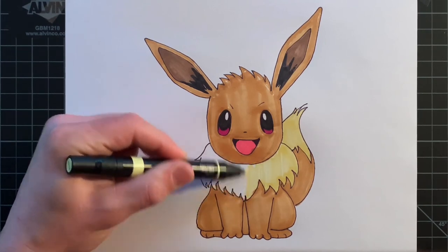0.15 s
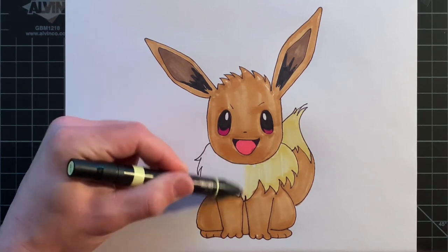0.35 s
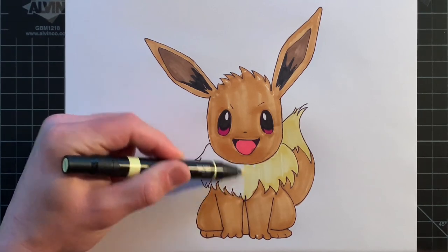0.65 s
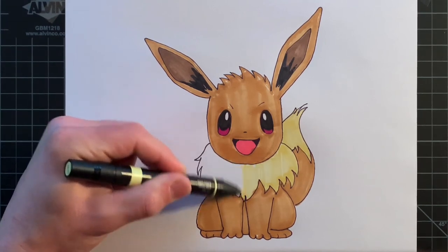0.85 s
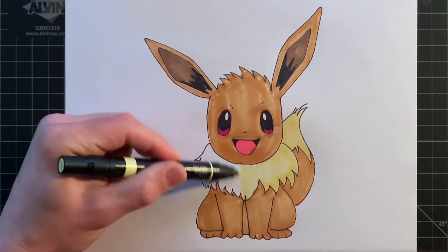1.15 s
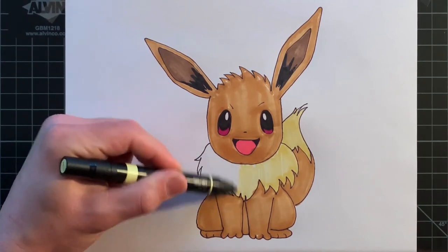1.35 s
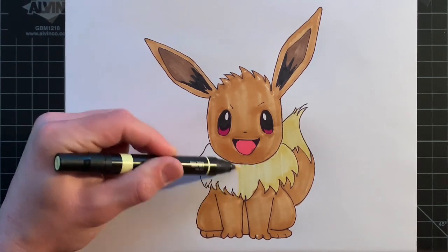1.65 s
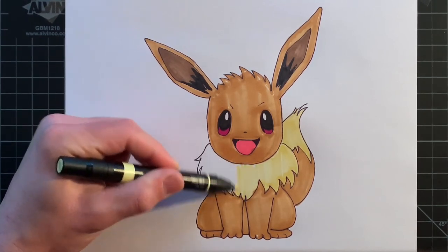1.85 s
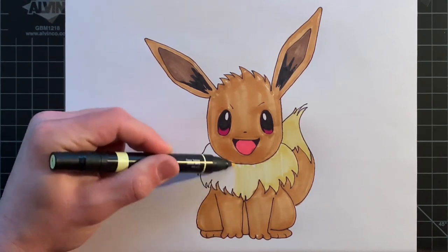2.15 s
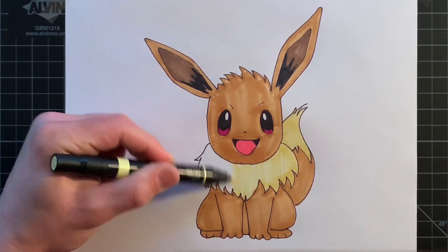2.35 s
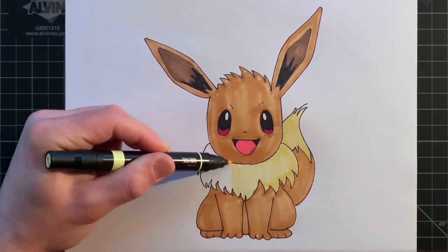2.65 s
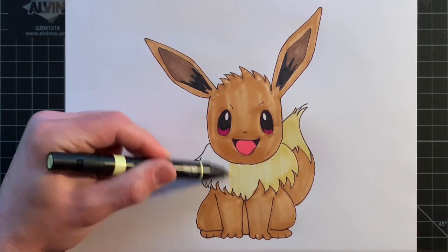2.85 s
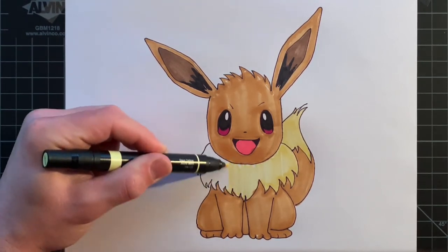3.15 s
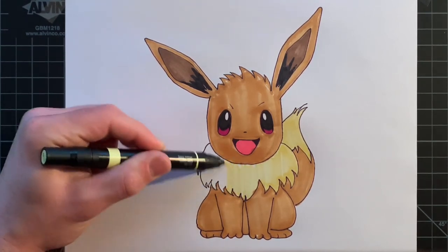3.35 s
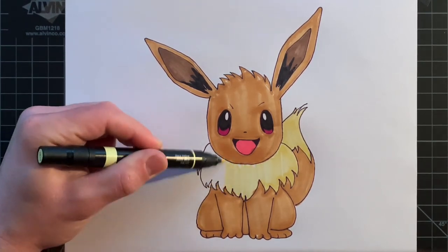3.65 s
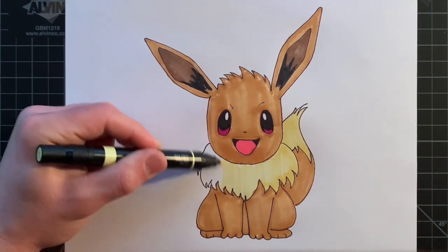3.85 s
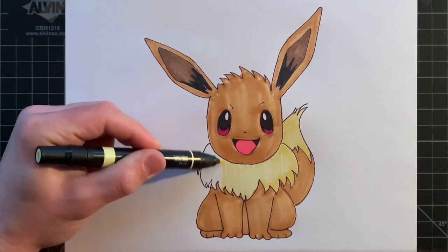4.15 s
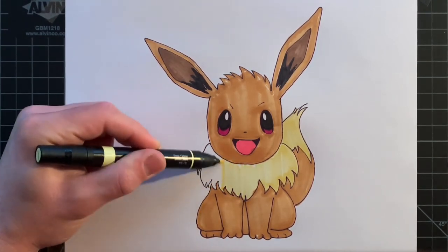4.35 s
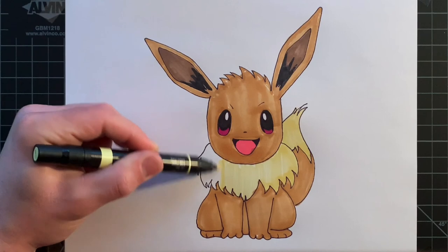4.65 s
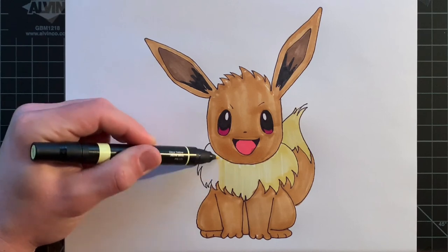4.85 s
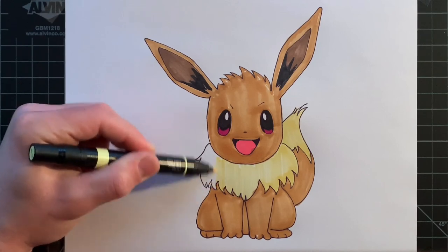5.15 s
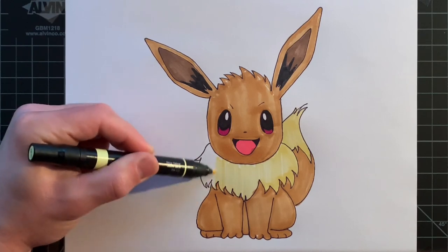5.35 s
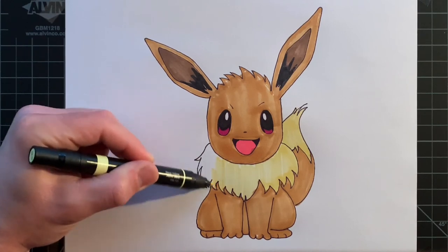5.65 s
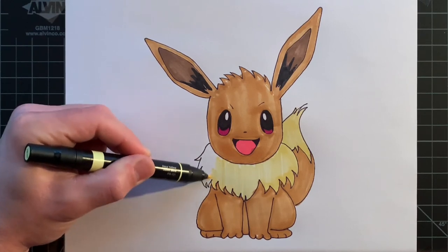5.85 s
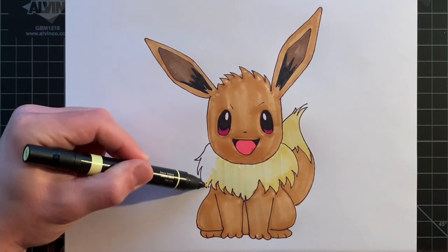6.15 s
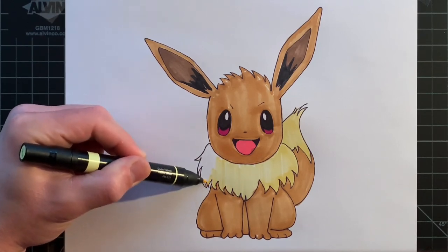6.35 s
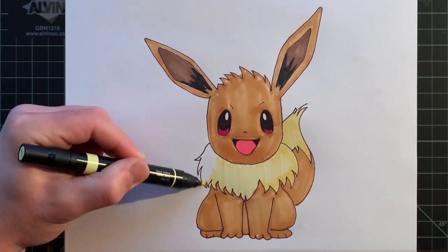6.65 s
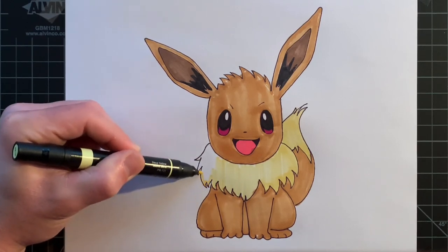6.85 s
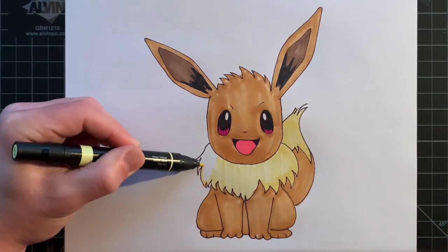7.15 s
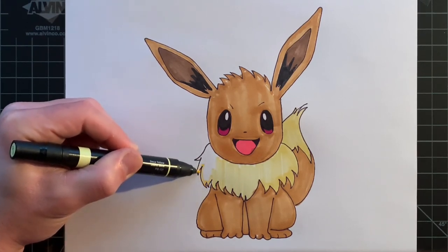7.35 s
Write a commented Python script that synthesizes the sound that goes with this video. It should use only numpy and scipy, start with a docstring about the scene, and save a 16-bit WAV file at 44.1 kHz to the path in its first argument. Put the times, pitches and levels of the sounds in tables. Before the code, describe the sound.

From the very start, already in motion, a felt-tip marker colours paper with quick back-and-forth strokes, about eight per second. Each is a short, dry, grainy hiss that swells and brakes, brightest at its fastest point; louder and softer strokes alternate. Sheet and desk add a faint, dull hum. The rhythm stays steady, with small stumbles and tiny extra scuffs around 3.3 to 3.6 seconds, then continues until about 5.6. From 5.7 the rubbing thins to short, light, uneven dabs, much quieter and with changing brightness, separated by little gaps. The side of the hand rustles very softly along with them. The nib ticks the sheet at about 6.5 and almost inaudibly at 7.0. Weak dabs continue to the end near 7.5, the last slightly firmer. Close stereo pickup from above, small quiet room, short dull reflections, gently wavering low rumble and very faint hiss.

```python
"""At a desk in a small quiet room, a felt-tip marker colours paper with quick up-and-down strokes,
then a few short light dabs. Felt fibres snap over the paper grain as dense noise bursts over fine hiss;
nib, barrel and sheet colour them, and sheet and desk hum along. The side of the hand rustles during
the dabs, and the nib taps the sheet. A two-port microphone hears it from above, over low rumble and hiss."""
import sys
import numpy as np
from scipy import signal
from scipy.fft import rfft, irfft, next_fast_len
from scipy.io import wavfile
from scipy.ndimage import uniform_filter1d, map_coordinates

SR = 44100
rng = np.random.default_rng(int(sys.argv[2]) if len(sys.argv) > 2 else 0)


def wrap_up_sound(samples):
    """Save the sound to the file named by the first command line argument, as 16-bit audio."""
    columns = np.atleast_2d(samples).T
    # keep every value between -1 and 1, then stretch to whole-number steps
    tamed = np.clip(columns, -1, 1)
    steps = np.round(tamed * 32767).astype(np.int16)
    wavfile.write(sys.argv[1], SR, steps)


def decibels_to_gain(level_db):
    """Convert a level in decibels to a linear amplitude gain (20 dB per decade)."""
    exponent = np.asarray(level_db, float) / 20
    return 10 ** exponent


N = 330309  # length of the sound in samples

# light dabs: start t/s, length t/s, level at the fastest motion/dB, place of that motion (0-1),
# treble change/dB
LIGHT_DABS = [(5.683, 0.086, -38.5, 0.47, -12), (5.817, 0.092, -45, 0.46, -0.5),
              (6.023, 0.063, -48.5, 0.6, 2.5), (6.207, 0.043, -43, 0.5, -18),
              (6.413, 0.078, -48.5, 0.42, -4), (6.525, 0.05, -52.5, .2, -8), (6.614, 0.22, -48, 0.48, -25),
              (6.829, 0.22, -49, 0.45, -9), (7.152, 0.11, -54.5, .35, 4.5), (7.35, 0.14, -51.5, 0.16, -0.5),
              (7.452, .05, -45, 0.63, 3.5)]
# the nib touches down: t/s, peak level before the pen colours it/dB
NIB_TAPS = [(6.5345, -33), (7.012, -54)]
# resonances of nib, barrel and sheet: f/Hz, width f/Hz, gain/dB
PEN_MODES = [(3800, 200, 3), (4080, 160, 4), (4520, 100, 4), (5120, 160, 4), (5600, 300, 2), (6590, 130, 4),
             (6890, 120, 3), (7150, 200, 5), (7490, 170, 4), (8200, 200, 3), (8830, 220, 3), (9460, 100, 2),
             (10340, 200, 5), (11070, 120, 4), (11470, 90, 3), (11800, 200, 6), (12840, 200, 4),
             (13170, 100, 3), (13600, 140, 4), (13950, 80, 3), (14250, 100, 4), (14490, 80, 3),
             (14940, 250, 3)]
# resonances of the desk: f/Hz, width f/Hz, gain/dB
DESK_MODES = [(53, 10, 3), (73, 9, 11), (99, 10, 3), (129, 14, 9), (150, 10, 4), (189, 20, 7), (226, 14, 3),
              (279, 18, 6), (317, 14, 8), (432, 11, 7), (480, 20, 4), (541, 20, 4), (1020, 40, 6),
              (1300, 60, 6), (1562, 50, 5), (1800, 120, -9), (1911, 50, 5), (2049, 50, 4), (2329, 80, 6),
              (2837, 60, 5)]


def level(x, db):
    """Scale a sound to an rms (average) level."""
    return x * decibels_to_gain(db) / np.sqrt(np.mean(x ** 2))


def colour(x, points, modes=()):
    """Filter by a broad spectrum (f/Hz, gain/dB) plus resonances, ringing only after the sound."""
    size = 8192
    hz = np.arange(size // 2 + 1) * SR / size + 1
    point_hz, point_db = [p[0] for p in points], [p[1] for p in points]
    gain_db = np.interp(np.log(hz), np.log(point_hz), point_db)
    gain_db = gain_db + sum(db / (1 + (2 * (hz - f) / width) ** 2) for f, width, db in modes)
    # folding the cepstrum (spectrum of the log gain) puts all the ringing after the start
    cepstrum = irfft(np.log(decibels_to_gain(gain_db)))
    cepstrum[1:size // 2] *= 2
    cepstrum[size // 2 + 1:] = 0
    response = irfft(np.exp(rfft(cepstrum)))
    response = response.reshape((1,) * (x.ndim - 1) + (-1,))
    return signal.fftconvolve(x, response, axes=-1)[..., :N]


def above(x, hz):
    """The part of a sound above a frequency, without delay."""
    return signal.sosfiltfilt(signal.butter(2, hz, "high", fs=SR, output="sos"), x)


def smooth(x, seconds):
    """Running mean, twice."""
    width = max(int(seconds * SR), 1)
    return uniform_filter1d(uniform_filter1d(x, width), width)


def walk(rate):
    """Slow random wandering with spread 1; a higher rate (per second) wanders faster."""
    x = smooth(rng.standard_normal(N), 1 / rate)
    return x / x.std()


def pair(common, lag_s, alike_hz):
    """Left and right noise: shared in the bass, with the right lagging, and unrelated above."""
    low = signal.butter(1, alike_hz, fs=SR, output="sos")
    own = rng.standard_normal((2, N))
    both = np.array([common, np.roll(common, int(lag_s * SR))])
    return signal.sosfilt(low, both - own) + own


def ports(x):
    """The sound reaches the right port first, with about a quarter turn of phase."""
    lag_s, phase_rad = 11.1 / SR, 1.5
    size = next_fast_len(N + 64)
    hz = np.arange(size // 2 + 1) * SR / size
    half_turn = (2 * np.pi * hz * lag_s + phase_rad) / 2
    return irfft(rfft(x, size) * np.exp(1j * np.array([-half_turn, half_turn])), size)[:, :N]


def contact():
    """Rubbing level in dB: the nib breaks loose, speeds up, slows down and brakes for each turn."""
    # quick strokes: start t/s, length t/s, level at the fastest motion/dB, place of that motion (0-1)
    quick_strokes = [(0.0, 0.045, -36, 0.17), (0.052, 0.13, -40.5, 0.29), (.178, 0.12, -35, 0.43),
                     (0.302, 0.12, -38.5, 0.27), (0.425, 0.13, -35, 0.45), (0.55, 0.13, -40, 0.22),
                     (0.684, 0.12, -36, 0.41), (.806, 0.13, -39.5, 0.11), (0.93, .12, -36, 0.49),
                     (1.057, 0.12, -41.5, 0.18), (1.177, .12, -35.5, .45), (1.298, 0.12, -40, 0.13),
                     (1.42, 0.12, -37, 0.49), (1.54, 0.12, -40, 0.26), (1.681, .11, -36.5, 0.47),
                     (1.8, 0.12, -41.5, 0.35), (1.919, .12, -36, 0.47), (2.04, 0.12, -39.5, .1),
                     (2.159, 0.12, -36, 0.6), (2.286, 0.11, -39.5, 0.07), (2.401, .12, -36.5, 0.51),
                     (2.522, 0.12, -40, 0.27), (2.643, 0.13, -36.5, 0.46), (2.776, 0.12, -40, 0.23),
                     (2.891, 0.12, -37, 0.56), (3.013, 0.12, -40, 0.16), (3.131, 0.12, -37.5, 0.44),
                     (3.251, 0.073, -41, 0.15), (3.311, 0.045, -46, .4), (3.369, .13, -36.5, 0.54),
                     (3.497, 0.074, -41.5, 0.32), (3.578, 0.025, -47, 0.54), (3.625, 0.13, -36.5, 0.48),
                     (3.759, 0.12, -39.5, 0.23), (3.88, 0.14, -37, 0.39), (4.012, 0.12, -38.5, 0.32),
                     (4.128, 0.11, -37.5, 0.41), (4.241, 0.12, -39.5, 0.21), (4.372, .11, -37, 0.51),
                     (4.484, 0.12, -40.5, 0.26), (4.605, 0.12, -37, .5), (4.725, 0.12, -39.5, 0.14),
                     (4.846, 0.12, -36.5, 0.46), (4.969, 0.12, -41.5, 0.02), (5.089, .14, -36.5, 0.53),
                     (5.225, 0.091, -41, 0.24), (5.324, .11, -40, 0.54), (5.445, 0.11, -38.5, 0.43),
                     (5.558, .1, -38.5, 0.31)]
    # dB lost over one stroke length before and after the fastest motion
    stroke_up_db, stroke_down_db = 12.5, 13
    dab_up_db, dab_down_db = 7.5, 12.5
    grip_s = 0.01  # time the nib takes to break loose
    lift_place, lift_db_per_s = 0.81, 590  # where in the stroke the nib brakes, and how fast it fades
    t, rub = np.arange(N) / SR, np.zeros(N)
    rows = [(*row, stroke_up_db, stroke_down_db) for row in quick_strokes]
    rows += [(*row[:4], dab_up_db, dab_down_db) for row in LIGHT_DABS]
    for start, length, peak_db, place, up_db, down_db in rows:
        a, b = int(start * SR), min(int((start + length + 0.068) * SR), N)
        since = t[a:b] - start
        off = since / length - place
        body_db = peak_db - np.maximum(-up_db * off, down_db * off)
        body_db = body_db - lift_db_per_s * np.maximum(since - lift_place * length, 0)
        # a stroke at time zero is already moving
        loose = np.minimum(1, (start == 0) + np.sqrt(np.abs(since) / grip_s))
        rub[a:b] = np.maximum(rub[a:b], decibels_to_gain(body_db) * loose)
    # the nib is in the air just before the first tap
    tap_s = NIB_TAPS[0][0]
    rub[int((tap_s - 0.02) * SR):int((tap_s + 0.002) * SR)] = 0
    return 20 * np.log10(smooth(rub, 0.003) + 1e-6)


def fibres(rate=9000, spread_db=3.0):
    """Dense snaps (rate per second) of uneven size over a fine hiss, bunched by the paper grain."""
    size_db = spread_db * np.minimum(rng.exponential(size=N), 2.2)
    snaps = (rng.random(N) < rate / SR) * rng.standard_normal(N) * decibels_to_gain(size_db)
    mix = level(snaps, -13.5) + level(rng.standard_normal(N), -10.5)
    grain_db = 0.36 * walk(220) + 1.0 * walk(54)
    return level(mix * decibels_to_gain(grain_db), 0)


def hand_echo(x, lag_s=0.000953, sway_s=0.00008, echo_db=-11):
    """The fingers reflect the hiss; as they move, the ripple in its colour shifts."""
    moving_lag_s = lag_s + sway_s * walk(4.4)
    return x + decibels_to_gain(echo_db) * map_coordinates(x, [np.arange(N) - SR * moving_lag_s], order=3)


def marker(rub_db):
    """Friction hiss of felt on paper; faster rubbing is brighter."""
    # broad colour of felt on paper: f/Hz, level per Hz/dB
    felt_colour = [(1500, -40), (2700, -28), (3100, -16), (4000, -9), (5100, -5), (6000, -9), (6800, -17),
                   (8000, -13), (9300, -6), (10700, -13), (12500, -9), (14000, -8), (15500, -8),
                   (20000, -8)]
    # change of colour when the pen stands steeper for the dabs: f/Hz, width f/Hz, gain/dB
    steep_modes = [(2150, 490, 11.5), (3150, 1100, 1.5), (6170, 320, -12.5), (7400, 390, 2.5),
                   (8900, 4500, 5), (11700, 300, 1), (12200, 310, -6)]
    steep_from_s, treble_hz, top_hz = 5.8, 5400, 11960
    rub, t = hand_echo(fibres()), np.arange(N) / SR
    flat = level(colour(rub, felt_colour, PEN_MODES), 0)
    steep = level(colour(rub, felt_colour, PEN_MODES + steep_modes), 0)
    hiss = np.where(t < steep_from_s, flat, steep)
    treble, top = above(hiss, treble_hz), above(hiss, top_hz)
    below = hiss - treble

    speed_db = np.maximum(rub_db, -54) + 35.5  # the rubbing level stands for the speed
    dab_starts = [dab[0] for dab in LIGHT_DABS]
    # each dab's treble change holds until the next dab
    treble_db = np.array([0.1] + [dab[-1] for dab in LIGHT_DABS])[np.searchsorted(dab_starts, t)]
    treble_db = treble_db + 0.63 * speed_db + 0.63 * walk(27)
    top_db = np.where(t < dab_starts[0], 0.1, -13) + 0.16 * speed_db + 2.4 * walk(22)
    bright = decibels_to_gain(treble_db) * (treble - top + decibels_to_gain(top_db) * top)
    return decibels_to_gain(rub_db) * (below + bright)


def background():
    """Low rumble rings the desk's resonances, over the microphone's own hiss."""
    # wandering rumble: t/s, base level of the deep part/dB, base level of the drone above it/dB
    rumble_levels = [(0.0, -57.5, -66), (0.21, -60, -56), (1.69, -61.5, -59.5), (2.56, -57, -57.5),
                     (5.42, -60, -58), (6.3, -57.5, -60.5), (6.42, -67, -60.5), (7.03, -56, -60),
                     (7.49, -62, -67.5)]
    # colours of the deep part, the drone and the microphone hiss: f/Hz, level per Hz/dB
    deep_colour = [(15, 0.5), (40, 0), (70, 9), (100, -1.5), (130, -39.5)]
    drone_colour = [(70, -23), (110, -0.5), (200, -3.5), (350, -9.5), (500, -20.5), (800, -23), (1400, -40),
                    (1800, -79)]
    hiss_colour = [(300, 8), (1500, 4.5), (5000, 4), (7000, -13), (14000, -4), (20000, 4)]
    s, deep_db, drone_db = np.transpose(rumble_levels)
    t = np.arange(N) / SR
    deep = pair(rng.standard_normal(N), 0.0003, 450.0)
    deep = level(colour(deep, deep_colour, DESK_MODES), 0)
    drone = pair(rng.standard_normal(N), 0.00035, 490.0)
    drone = level(colour(drone, drone_colour, DESK_MODES[:12]), 0)
    rumble = decibels_to_gain(np.interp(t, s, deep_db) + 1.13 * walk(5.6)) * deep
    rumble = rumble + decibels_to_gain(np.interp(t, s, drone_db) + 1.63 * walk(3.4)) * drone
    hiss = level(colour(rng.standard_normal((2, N)), hiss_colour), -83)
    return rumble * decibels_to_gain(np.array([[0.6], [-0.6]])) + hiss  # rumble slightly louder on the left


def room(x, t60=0.19, wide_db=-10):
    """A dull tail, falling 60 dB in t60 seconds: most comes off the desk, some from all sides."""
    t = np.arange(int(0.3 * SR)) / SR
    tail = rng.standard_normal((3, len(t))) * decibels_to_gain(-60 * t / t60) * (t > 0.002)
    tail = signal.sosfilt(signal.butter(1, 9000.0, fs=SR, output="sos"), tail)
    tail = tail / np.sqrt(np.sum(tail ** 2) / 3)
    wet = signal.fftconvolve(x[None], tail, axes=-1)[:, :N]
    return ports(wet[0]) + decibels_to_gain(wide_db) * wet[1:]


def desk(rub_db):
    """Sheet and desk take the rubbing up slowly and less steeply, and radiate wide."""
    # colour of sheet and desk top under the nib: f/Hz, level per Hz/dB
    sheet_colour = [(100, -21.5), (250, -0.5), (450, -2), (600, -11), (900, -11), (1300, -15), (1800, -14),
                    (2300, -18.5), (2800, -14.5), (3600, -30)]
    drive = smooth(np.roll(decibels_to_gain(0.65 * rub_db), int(0.011 * SR)), 0.022)
    # weaker under the light dabs than under the quick strokes
    sheet_db = np.where(np.arange(N) / SR < LIGHT_DABS[0][0], -31, -34.5)
    hum = colour(pair(rng.standard_normal(N), 0.00053, 690.0), sheet_colour, DESK_MODES)
    return decibels_to_gain(sheet_db) * drive * level(hum, 0)


def palm():
    """The side of the hand slides on the sheet: a dull, wide rustle of skin along with the dabs."""
    # slides: start t/s, length t/s, base level/dB
    slides = [(5.684, 0.24, -69.5), (6.058, 0.027, -71.5), (6.24, .02, -79), (6.447, 0.049, -73),
              (6.67, 0.12, -73.5), (6.89, 0.12, -68.5), (7.172, 0.061, -71), (7.39, 0.13, -76)]
    # colour of skin on paper: f/Hz, level per Hz/dB
    skin_colour = [(300, -24), (550, -4.5), (800, -1.5), (1300, -3.5), (1550, -5.5), (1900, -50)]
    rise_db_per_s, fall_db_per_s = 503, 204
    t, slide = np.arange(N) / SR, np.zeros(N)
    for start, length, db in slides:
        before_db = rise_db_per_s * np.maximum(start - t, 0)
        after_db = fall_db_per_s * np.maximum(t - start - length, 0)
        slide += decibels_to_gain(db - before_db - after_db)
    rustle = level(colour(rng.standard_normal((2, N)), skin_colour), 0)
    return smooth(slide * decibels_to_gain(3.8 * walk(29)), 0.0082) * rustle


def taps():
    """The nib touches down: a short fading noise tick rings the pen."""
    # colour of the tick: f/Hz, level per Hz/dB
    tick_colour = [(500, -12), (2500, -7), (4000, 0), (5500, -2), (7000, -9), (16000, -13)]
    out, sample = np.zeros(N), np.arange(130)
    ticks = rng.standard_normal((len(NIB_TAPS), 130)) * np.exp(-sample / 16.0)
    for (s, db), tick in zip(NIB_TAPS, ticks):
        start = int(s * SR)
        out[start:start + len(tick)] = decibels_to_gain(db) * tick
    return colour(out, tick_colour, PEN_MODES)


def scene():
    """Pen, room, desk, hand and background together."""
    rub_db = contact()
    pen = marker(rub_db) + taps()
    return ports(pen) + decibels_to_gain(-19.5) * room(pen) + desk(rub_db) + palm() + background()


def band_limit(x):
    """A steep low-pass at the top of the band."""
    return signal.sosfilt(signal.butter(12, 17000, fs=SR, output="sos"), x)


def record(dry):
    """The recorder cuts the top of the treble steeply."""
    top_cut = signal.ellip(14, 0.2, 70, 15710, fs=SR, output="sos")  # cut at 15710 Hz
    return band_limit(signal.sosfilt(top_cut, dry))


dry = scene()
out = record(dry)
wrap_up_sound(out)
```